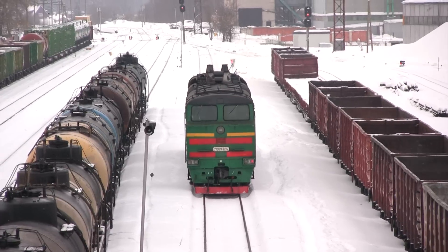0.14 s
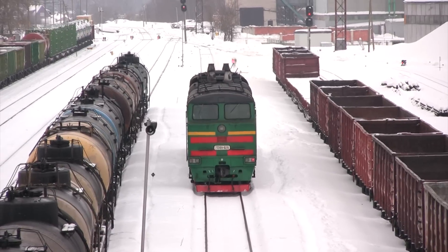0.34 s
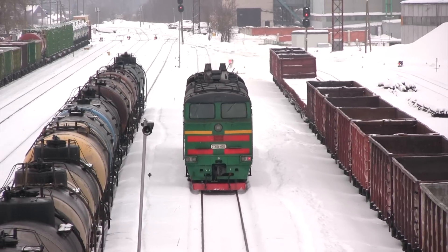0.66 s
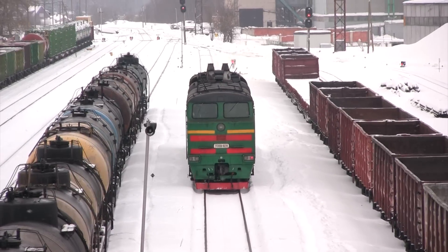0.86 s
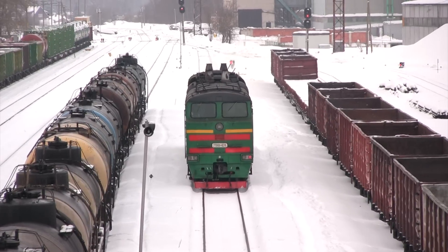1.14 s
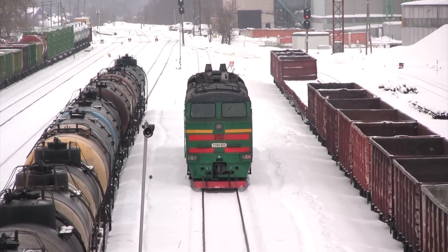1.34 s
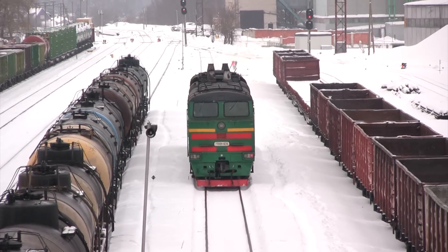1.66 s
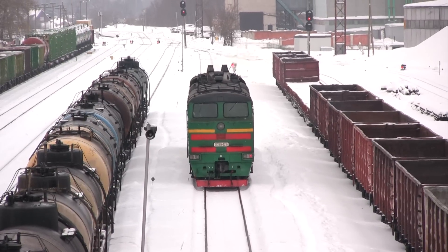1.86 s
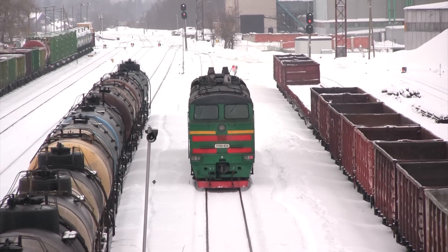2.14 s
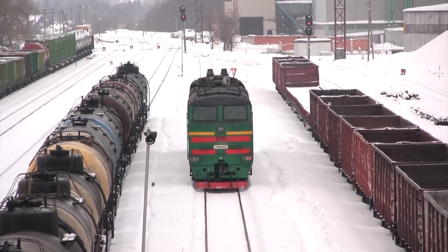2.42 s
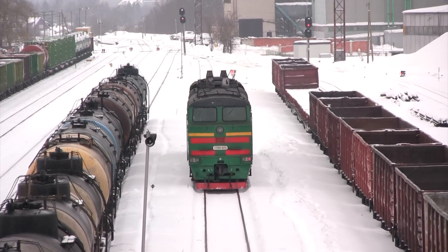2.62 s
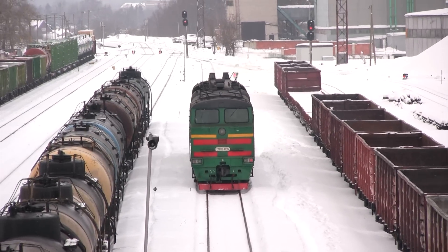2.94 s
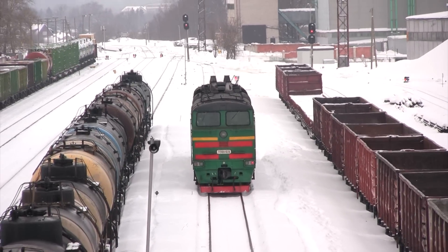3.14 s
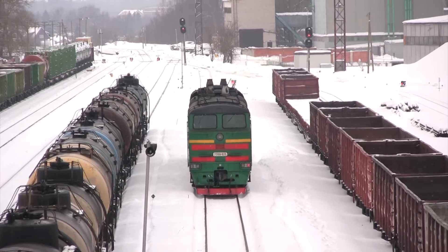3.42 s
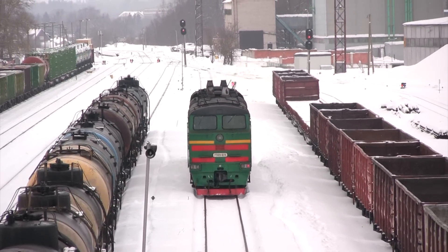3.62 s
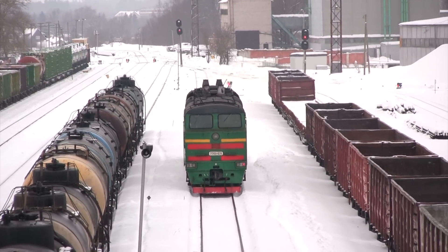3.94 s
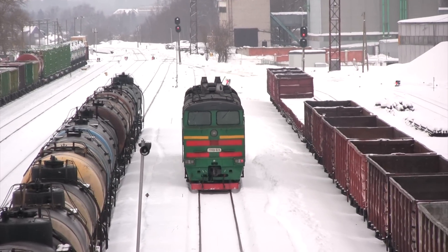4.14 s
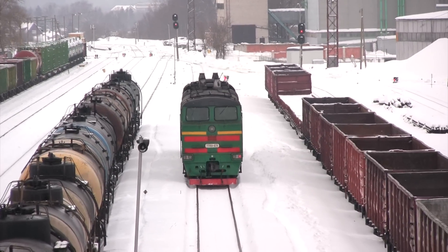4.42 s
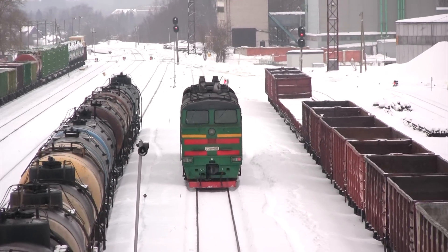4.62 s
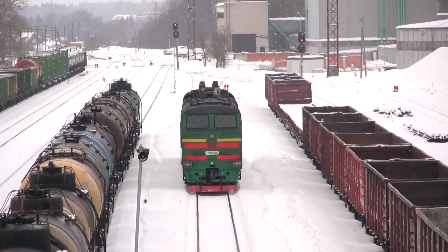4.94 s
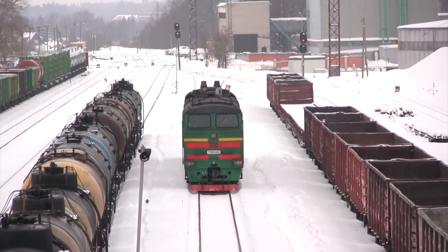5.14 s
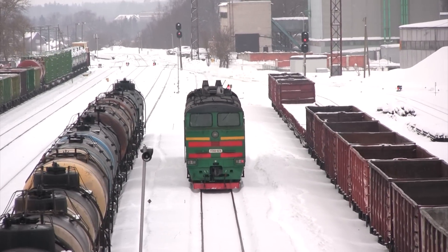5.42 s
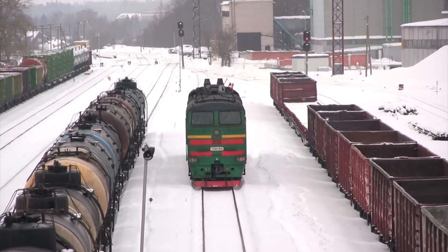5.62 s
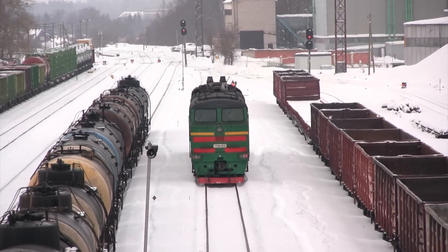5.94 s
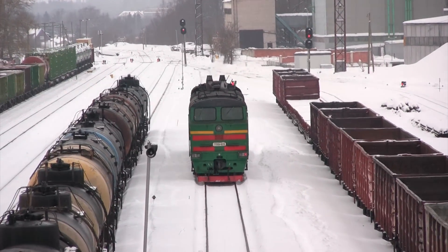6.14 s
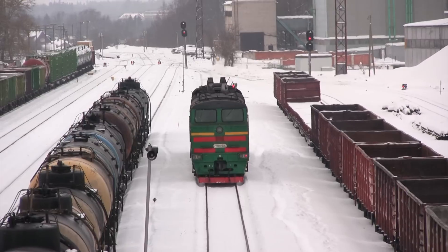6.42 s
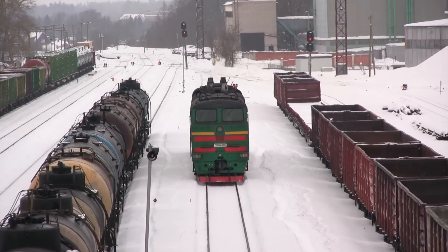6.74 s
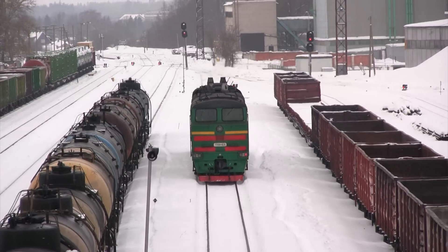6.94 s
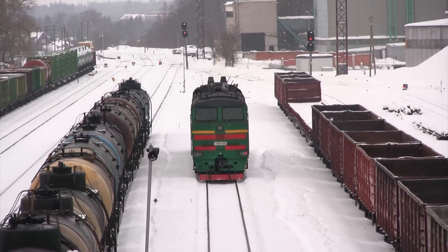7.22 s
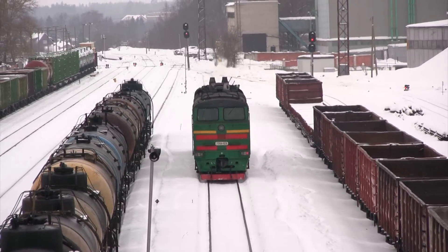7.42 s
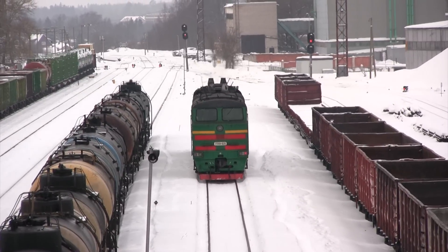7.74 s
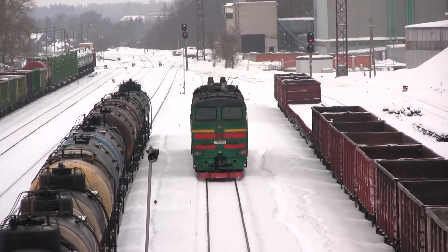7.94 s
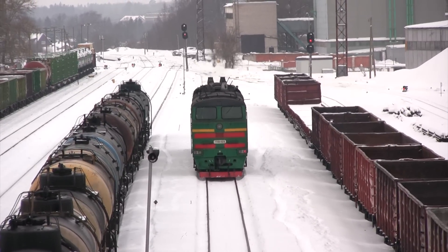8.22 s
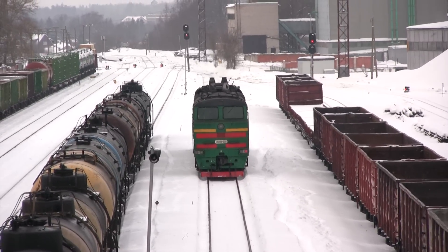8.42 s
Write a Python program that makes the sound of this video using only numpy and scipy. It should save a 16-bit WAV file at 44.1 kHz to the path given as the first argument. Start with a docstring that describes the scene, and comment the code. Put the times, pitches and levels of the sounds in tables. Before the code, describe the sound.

Outdoor stereo camera sound of a heavy diesel engine some tens of metres off: bassy, uneven puffs merge into a continuous galloping throb, strongest at first, then idling and gently receding. A soft mid roar and clattering ride on it. The camera's own thin whine, buzz and hiss stay constant nearby, with occasional tiny ticks, rustles and metallic handling knocks. Only a faint short echo comes off the wagons.

```python
"""A diesel locomotive rolls away through a rail yard; its exhaust throbs in a repeating gallop.
Uneven, mistimed puffs from sixteen cylinders ring the stack; the engine pulls for a second, then eases to idle.
Thuds, a knocking engine block, a honking compressor, roaring noise and a thin whine join the exhaust.
Close by, steady tones and a pulsing buzz make a camera's mechanism, with hiss, and filtered noise bursts
make small clicks, rustles and metal knocks."""
import sys
import numpy as np
from scipy import signal
from scipy.fft import rfft, irfft, next_fast_len
from scipy.io import wavfile
from scipy.ndimage import uniform_filter1d, map_coordinates

SR = 44100
rng = np.random.default_rng(int(sys.argv[2]) if len(sys.argv) > 2 else 0)


def log_audio(samples):
    """Write samples as a 16-bit WAV file to the path given in sys.argv[1]."""
    # one column per channel
    frames = np.atleast_2d(samples).T
    # limit to full scale, then quantise
    limited = np.clip(frames, -1, 1)
    pcm = np.round(limited * 32767).astype(np.int16)
    wavfile.write(sys.argv[1], SR, pcm)


N = 377937
TIME = np.arange(N) / SR
HZ = np.fft.rfftfreq(N, 1 / SR)

# how alike left and right are, 1 = identical, below 0 = opposed: (frequency [Hz], likeness)
LIKENESS = [(30, .93), (150, .995), (300, .98), (500, .95), (1200, .91), (2500, .7), (4500, .45),
            (7000, .2), (9300, -.55), (12000, 0)]


def gain_of(db):
    """Turns decibels into an amplitude factor."""
    return 10 ** (np.asarray(db) / 20)


def evened(x):
    """Scales a sound to an rms of 1."""
    return x / np.sqrt(np.mean(x ** 2) + 1e-20)


def read(points, hz):
    """Reads a frequency table at hz, with straight lines on a log-frequency axis."""
    f, value = np.transpose(points)
    return np.interp(np.log(hz + 1), np.log(f + 1), value)


def curve(rows, t):
    """Reads each value column of a time table at the times t."""
    s, *columns = np.transpose(rows)
    return [np.interp(t, s, column) for column in columns]


def add(mix, s, sound):
    """Mixes a sound into mix, starting at time s."""
    part = mix[:, max(round(s * SR), 0):][:, :sound.shape[1]]
    part += sound[:, :part.shape[1]]


def drift(rate_hz):
    """Slow random wandering of about rms 1: a smooth path through random points."""
    points = rng.standard_normal(2048)
    return map_coordinates(points, [TIME * rate_hz * 2], order=2, mode="wrap")


def noise(spectrum):
    """Stereo noise coloured by a spectrum table; its left and right are as alike as LIKENESS says."""
    common, apart = rfft(rng.standard_normal((2, N)))
    same = np.clip(read(LIKENESS, HZ), -1, 1)
    mid = common * np.sqrt(1 + same)
    side = apart * np.sqrt(1 - same)
    pair = np.array([mid + side, mid - side])
    return evened(irfft(pair * gain_of(read(spectrum, HZ)), N))


def ring(spectrum, lag=0.39, size=8192):
    """The ringing of a body with this spectrum; lag 1 starts abruptly, lag 0 swells as slowly as it dies."""
    log_gain = np.log(gain_of(read(spectrum, abs(np.fft.fftfreq(size, 1 / SR)))))
    phase = -lag * signal.hilbert(log_gain).imag
    response = np.fft.ifft(np.exp(log_gain + 1j * phase)).real
    return np.fft.fftshift(response)


def burst(envelope, hz, octaves, apart=0.44):
    """A stereo puff of noise around hz; apart sets how much left and right differ."""
    f = np.fft.rfftfreq(len(envelope), 1 / SR)
    mid, side = rng.standard_normal((2, len(envelope))) * envelope
    pair = np.array([mid + apart * side, mid - apart * side])
    octaves_away = np.log2((f + 1) / hz)
    return irfft(rfft(pair) / (1 + (octaves_away / octaves) ** 4), len(envelope))


def load(t):
    """How hard the engine pulls: 1 at first, then dying away towards 0 at idle."""
    ease_at_s, ease_s = 1.1, .8
    return np.exp(-np.maximum(t - ease_at_s, 0) / ease_s)


def nearness(t):
    """Sound weakens in proportion to distance as the locomotive rolls away at a walking pace."""
    distance_m, away_m_per_s = 45, 0.99
    return distance_m / (distance_m + away_m_per_s * t)


def crank_times(degrees):
    """The times when the crank has turned this far, found by adding up its speed; -1 outside the scene."""
    # engine speed: (time [s], speed [rpm])
    engine_speed = [(0.0, 295.3), (0.6, 302.4), (1.1, 310), (1.5, 315), (2.2, 311.1), (3.0, 308.2),
                    (4.0, 305.6), (5.0, 301.3), (6.0, 300.1), (7.0, 299.6), (8.57, 298)]
    rpm = curve(engine_speed, TIME)[0]
    turned_deg = 360 * np.cumsum(rpm) / 60 / SR
    return np.interp(degrees, turned_deg, TIME, left=-1, right=-1)


def drum(ports, scatter_db=1.5, odd_db=-6, frame_db=-12, frame_scatter_db=3.5, flutter=.18):
    """A spinning drum buzzes mostly on its even harmonics; weak frame-rate lines lie between the harmonics."""
    # the housing colours the buzz: (frequency [Hz], level [dB per even harmonic, before scatter])
    housing = [(2500, -95), (3900, -81), (4300, -79.5), (5400, -79), (6200, -79), (7200, -83), (8200, -86),
               (9300, -81), (10500, -80.5), (11700, -86), (12400, -100), (13500, -99)]
    drum_hz, frame_hz = 150, 25
    hz = np.arange(SR // frame_hz // 2 + 1) * frame_hz
    uneven = rng.standard_normal(len(hz))
    phase = rng.uniform(0, 2 * np.pi, len(hz))
    harmonic_db = odd_db * (hz // drum_hz % 2) + scatter_db * uneven
    db = np.where(hz % drum_hz == 0, harmonic_db, frame_db + frame_scatter_db * uneven)
    # the less alike the sides are, the further apart their phases
    between = np.arccos(np.clip(read(LIKENESS, hz), -1, 1))
    lines = gain_of(read(housing, hz) + db) * np.exp(1j * (phase + ports * between))
    frame = irfft(lines) * np.sqrt(2) * len(hz)
    repeated = frame[:, np.arange(N) % frame.shape[1]]
    return repeated * (1 + flutter * drift(2.5))


def camera(waver_rad=0.84, flutter=0.19, fizz_db=-69, hiss_db=-61):
    """Close motor tones beat together, a drum buzzes and the housing fizzes, over faint microphone hiss."""
    # colour of the hiss: (frequency [Hz], relative level [dB per Hz])
    hiss_spectrum = [(2000, -15), (3400, -6.5), (4400, 2.5), (5200, -4.5), (6300, 0), (7600, -5),
                     (9400, 4.5), (11000, -3.5), (12000, -9), (12500, -18.5), (13500, -15.5)]
    # motor tones, the first three a whine with its sidebands:
    # (frequency [Hz], rms level before flutter [dB], phase between left and right [rad])
    motor_tones = [(4026, -69.5, 1.1), (4050, -68, .8), (4074, -71, .6), (4091, -72.5, .6),
                   (4500, -70.5, 1.6), (7200, -80, 1.2), (8001, -78, 1.6), (8452, -76, 1.8),
                   (9127, -72, 2.7), (9297, -71, 2.8), (9352, -67, 2.8), (9449, -71, 2.4)]
    ports = np.array([[.5], [-.5]])  # left and right
    out = gain_of(hiss_db) * noise(hiss_spectrum)
    for hz, db, between in motor_tones:
        size = np.sqrt(2) * gain_of(db) * (1 + flutter * drift(5.2))
        out += size * np.sin(2 * np.pi * hz * TIME + waver_rad * drift(5) + ports * between)
    fizz = evened(burst(np.ones(N), 9250, .04)[0])
    # the fizz is opposite in left and right
    return out + drum(ports) + gain_of(fizz_db) * 2 * ports * fizz


def small_sounds(tick_db=-48, tick_hz=8000, tick_octaves=.55, count=4):
    """Dry clicks and fainter random ticks are fast-dying noise; rustles and squeals are longer, soft-edged noise."""
    # clicks at the camera: (time [s], peak level [dB], centre [Hz], width [octaves])
    clicks = [(2.832, -24.5, 3500, 1.12), (3.357, -31.5, 4700, 1.1), (3.917, -43, 11040, 0.54),
              (4.115, -37, 9600, 0.69), (5.114, -41, 7700, .2), (5.678, -42, 7500, 0.77),
              (8.337, -29, 4643, 0.88)]
    # rustles and faint squeals: (time [s], length [s], rms level [dB], centre [Hz], width [octaves])
    rustles = [(1.769, 0.18, -57, 2290, .5), (3.333, 0.15, -66, 8470, 0.35), (4.7, 0.6, -74, 6170, .015),
               (6.141, 0.19, -73, 6130, .015), (6.413, 0.2, -61, 5400, .6),
               (7.022, 0.096, -61, 2857, 0.019), (7.845, 0.18, -54, 2278, 0.28)]
    click_t60_s = 0.0082  # time to fall by 60 dB
    lead_s = .01  # room ahead of the click for the filter to spread into
    out = np.zeros((2, N))
    t = np.arange(SR // 8) / SR
    ticks = [(s, tick_db, tick_hz, tick_octaves) for s in rng.uniform(0, N / SR, count)]
    decay = gain_of(-60 * abs(t - lead_s) / click_t60_s) * (t >= lead_s)
    for s, db, hz, octaves in clicks + ticks:
        click = burst(decay, hz, octaves)
        add(out, s - lead_s, gain_of(db) * click / abs(click).max())
    for s, length, db, hz, octaves in rustles:
        fade = signal.windows.tukey(int(length * SR), .5)
        add(out, s, gain_of(db) * evened(burst(fade, hz, octaves)))
    return out


def knocks(octaves=0.093):
    """Small metal knocks: each rings in a few blurred modes that die quickly."""
    # the knocks: (time [s], peak level [dB], lowest mode [Hz])
    metal_knocks = [(1.79, -31, 1690), (1.85, -34, 1650), (2.832, -22, 1020), (7.408, -31, 1900),
                    (7.864, -35, 2100)]
    # what each rings with: (multiple of the lowest mode, relative level [dB], time to fall by 60 dB [s])
    modes = [(1, 2, .065), (1.32, -6, .045), (1.76, -8.5, .05), (2.2, -16.5, .035), (2.88, -19, .02)]
    lead_s = .01  # room ahead of the knock for the filter to spread into
    out = np.zeros((2, N))
    t = np.arange(SR // 6) / SR
    for s, db, hz in metal_knocks:
        knock = np.zeros((2, len(t)))
        for ratio, mode_db, t60 in modes:
            decay = gain_of(-60 * abs(t - lead_s) / t60) * (t >= lead_s)
            knock += gain_of(mode_db) * evened(burst(decay, hz * ratio, octaves))
        add(out, s - lead_s, gain_of(db) * knock / abs(knock).max())
    return out


def whine(whine_hz=1496, level_db=-2.5, waver_hz=4, flutter=0.53):
    """A thin tone, as of a blower, whose pitch and strength waver at random."""
    # level of the whine, before level_db is added: (time [s], level [dB])
    whine_level = [(0, -46.5), (3, -50), (5, -49.5), (8.57, -46)]
    turns = np.cumsum(whine_hz + waver_hz * drift(14.4)) / SR
    level = gain_of(curve(whine_level, TIME)[0] + level_db)
    return level * evened(np.sin(2 * np.pi * turns) * (1 + flutter * drift(45)))


def machinery(train, roar_db=-35.0, chuff=0.037, chuff_s=0.015, flutter_db=0.74, swell_db=-0.34,
              rumble_db=-32.5, rumble_chuff=0.13, pulling_db=1.8):
    """A broad roar and a loose rumble swell with each puff; the rumble also grows under load."""
    # fans, gears and gas rush: (frequency [Hz], relative level [dB per Hz])
    roar_spectrum = [(180, -19), (290, 1), (340, -5), (410, -1), (475, -2), (540, -7), (720, -7.5),
                     (1000, -13.5), (1470, -11.5), (1760, -19.5), (2700, -28.5), (3400, -35.5), (5000, -41),
                     (11000, -100)]
    # loose rumble of the yard: (frequency [Hz], relative level [dB per Hz])
    rumble_spectrum = [(20, -29), (35, -13.5), (45, -9.5), (80, 14.5), (150, -4.5), (210, 15), (280, 6),
                       (350, -7), (500, -29), (1500, -110)]
    # each puff leaves a short, fading push of gas
    gas = evened(signal.lfilter([1], [1, -np.exp(-1 / (chuff_s * SR))], train))
    gas = gas - gas.mean()
    roar = noise(roar_spectrum) * gain_of(roar_db + swell_db * drift(0.98) + flutter_db * drift(14))
    rumble_level = gain_of(rumble_db + pulling_db * load(TIME)) * nearness(TIME)
    rumble = noise(rumble_spectrum) * rumble_level
    return roar * (1 + chuff * gas) + rumble * (1 + rumble_chuff * gas)


def compressor(uneven_db=2.0, count=46):
    """The air compressor gives a short hollow honk, a puff of narrow noise, in every turn of the crank."""
    # the honk: crank angle [degrees], rms level before unevenness [dB], centre [Hz], width [octaves], length [s]
    degrees, db, hz, octaves, length = (97, -48, 706.5, 0.1, 0.01)
    out = np.zeros((2, N))
    swell = np.pad(signal.windows.hann(int(length * SR)), (0, SR // 20))
    starts = crank_times(degrees + 360 * np.arange(count))
    for s, chance in zip(starts, rng.standard_normal(count)):
        if s > 0:
            honk = evened(burst(swell, hz, octaves, apart=0.23))
            add(out, s, gain_of(db + uneven_db * chance) * honk)
    return out


def clatter(train, level_db=-46, hz=600, octaves=0.52, t60_s=0.2):
    """Each firing also knocks the engine block, which rings briefly and always alike."""
    t = np.arange(SR // 8) / SR
    block = burst(gain_of(-60 * t / t60_s), hz, octaves, apart=0.21)
    knocked = signal.oaconvolve(train[None], block, axes=1)[:, :N]
    return gain_of(level_db) * evened(knocked)


def thuds(pulling_db=4.5, uneven_db=1.5, count=23):
    """Where surges crowd together the silencer answers with a short, deep swell, stronger under load."""
    # thuds in each two-turn engine cycle:
    # (crank angle [degrees], peak level [dB at idle, before unevenness and distance])
    cycle_thuds = [(80, -27.5), (148, -27), (508, -30), (672, -33.5)]
    thud_hz, thud_s = 88.7, 0.077
    out = np.zeros((1, N))
    t = np.arange(-thud_s / 2, thud_s / 2, 1 / SR)
    thud = (signal.windows.hann(len(t)) * np.cos(2 * np.pi * thud_hz * t))[None]
    for degrees, db in cycle_thuds:
        centres = crank_times(degrees + 720 * np.arange(count))
        for s, chance in zip(centres, rng.standard_normal(count)):
            if s > thud_s / 2:
                level = gain_of(db + pulling_db * load(s) + uneven_db * chance) * nearness(s)
                add(out, s - thud_s / 2, level * thud)
    return out


def yard(x, t60_s=0.54, first_s=0.016):
    """The rows of wagons scatter back a faint tail: many random echoes that die away."""
    t = np.arange(SR // 2) / SR
    echoes = rng.standard_normal(len(t)) * gain_of(-60 * t / t60_s) * (t > first_s)
    return signal.oaconvolve(x, echoes / np.linalg.norm(echoes))[:N]


def puffs(first_firing_deg=33, uneven_db=1.0, jitter_s=.00015, count=23):
    """Every cylinder fires once in two turns of the crank, each with its own strength and delay."""
    # sixteen cylinders in firing order: (delay of the surge, negative is early [crank degrees],
    # relative strength under load [dB], relative strength at idle [dB])
    cylinders = [(-11.5, -10.5, -8.5), (2, -0.4, 1.8), (10.5, 1.2, -1.8), (2.65, 1.5, -1.6),
                 (16.5, -26, -8.5), (-14.5, -5.2, -12.4), (18.5, -.3, -6), (-1.5, 1.5, -5.5), (15, -6, -9),
                 (0.6, -0.8, -5.5), (9.5, 1.5, -1.5), (1.6, 2.5, -5.5), (18.5, -3.5, -7.9),
                 (20, -3.5, -5.5), (-3.5, -7, -6), (-13.5, 2, -3)]
    late, loaded_db, idle_db = np.transpose(cylinders)
    firing = np.arange(count * len(late)).reshape(count, -1)  # one row for each engine cycle
    s = crank_times(first_firing_deg + 720 * firing / len(late) + late)
    s = s + jitter_s * rng.standard_normal(s.shape)
    db = idle_db + load(s) * (loaded_db - idle_db) + uneven_db * rng.standard_normal(s.shape)
    size = nearness(s) * gain_of(db)
    inside = s > 0
    return np.bincount((s[inside] * SR).astype(int), size[inside], N)[:N]


def exhaust(train, level_db=-20.0, yard_db=-15.5):
    """Surges boom through the stack; those well above the mean flow lose more, so they flatten and merge."""
    # exhaust stack and silencer: (frequency [Hz], relative level [dB])
    stack = [(35, -69.5), (60, -30), (80, -12.5), (103, -12), (128, -1), (155, 1.5), (180, -1), (200, -24),
             (270, -19.5), (400, -56.5), (900, -81), (2000, -120)]
    boom = evened(signal.oaconvolve(train, ring(stack), "same"))
    flow = abs(signal.hilbert(boom, next_fast_len(N)))[:N]
    excess = flow / np.sqrt(uniform_filter1d(flow ** 2, size=35000))  # against the running average
    boom = boom / (1 + (excess / 1.6) ** 4) ** .2
    low_cut = signal.butter(2, 45, "high", fs=SR, output="sos")
    boom = evened(signal.sosfiltfilt(low_cut, boom))
    return gain_of(level_db) * (boom + gain_of(yard_db) * yard(boom))


def scene():
    """Adds the locomotive's sounds, most of them driven by one train of puffs, to the small sounds close by."""
    train = puffs()
    nearby = camera() + small_sounds() + knocks()
    engine = whine() + machinery(train) + compressor() + clatter(train)
    return nearby + engine + thuds() + exhaust(train)


def record(dry):
    """The microphone's two ports differ a little in sensitivity; then the highest treble is cut off."""
    # balance of the ports: (frequency [Hz], left minus right [dB])
    balance = [(60, 1.2), (250, 2.5), (500, 0.6), (1000, 2), (2500, -0.2), (6000, 1), (10000, -2.6)]
    edge_hz = 13600
    tilt_db = np.array([[.5], [-.5]]) * read(balance, HZ)
    tilted = irfft(rfft(dry) * gain_of(tilt_db), N)
    treble_cut = signal.firwin(511, edge_hz, window=("kaiser", 9), fs=SR)
    return signal.oaconvolve(tilted, treble_cut[None], "same")


dry = scene()
out = record(dry)
log_audio(out)
```